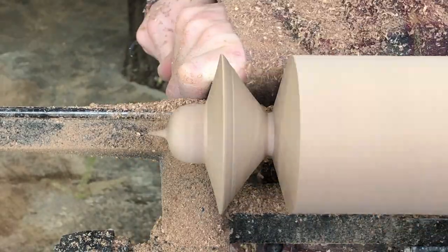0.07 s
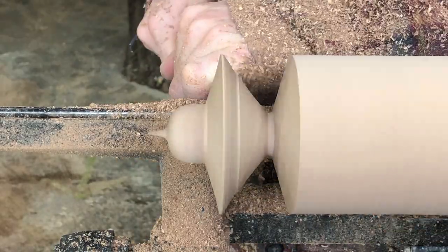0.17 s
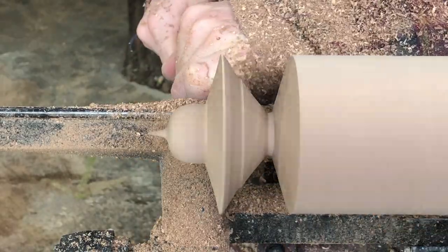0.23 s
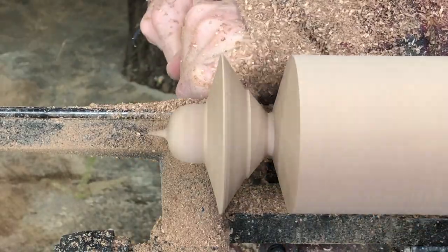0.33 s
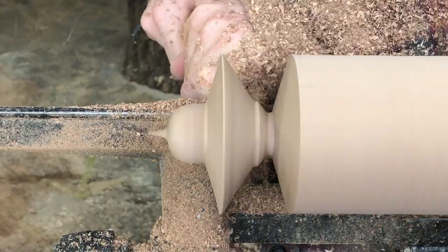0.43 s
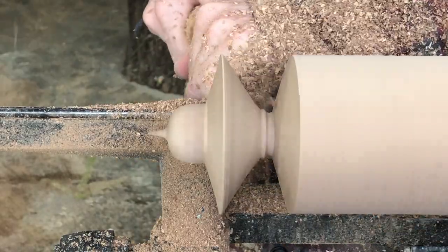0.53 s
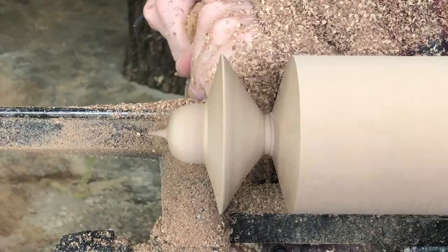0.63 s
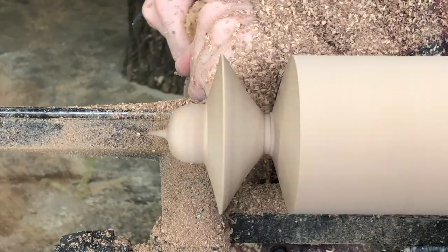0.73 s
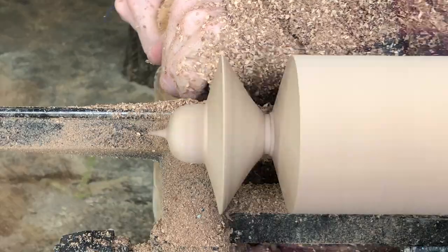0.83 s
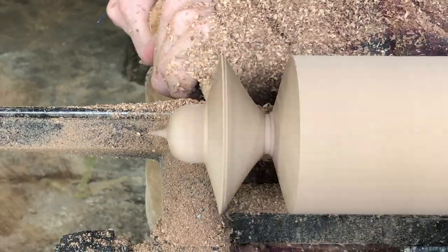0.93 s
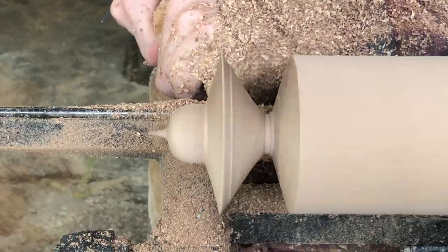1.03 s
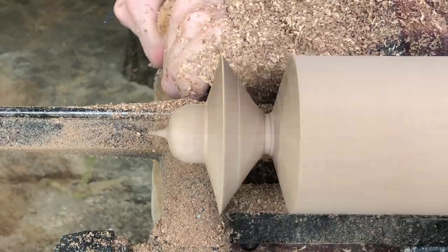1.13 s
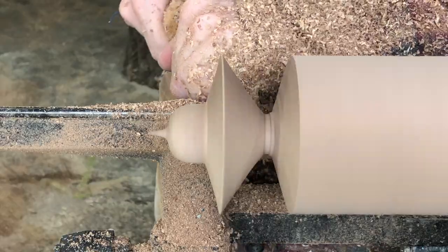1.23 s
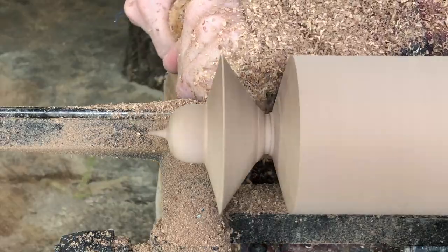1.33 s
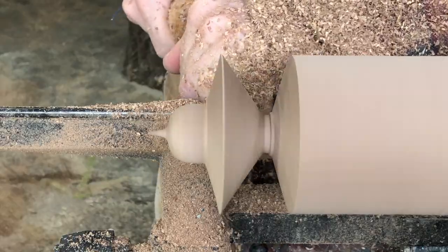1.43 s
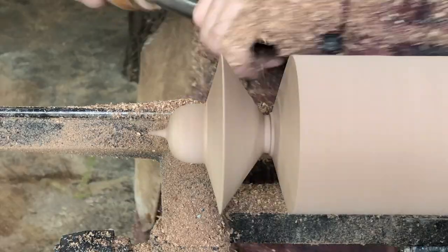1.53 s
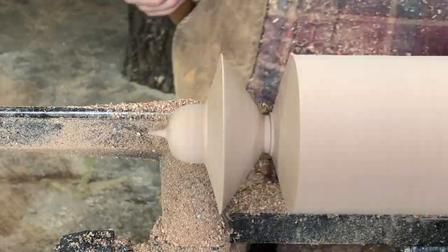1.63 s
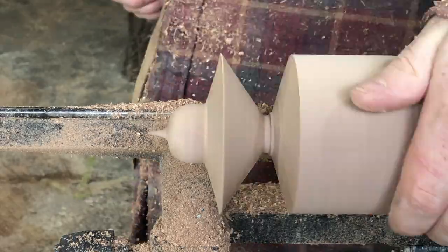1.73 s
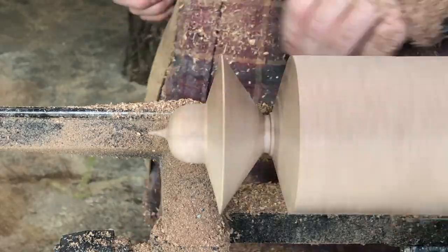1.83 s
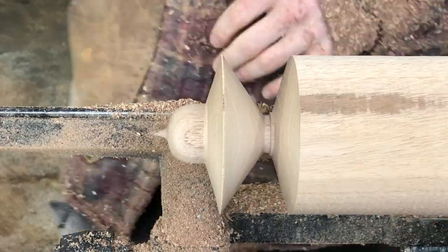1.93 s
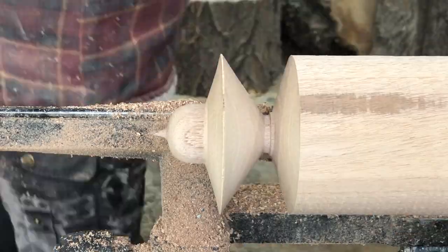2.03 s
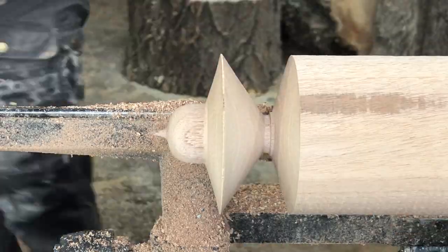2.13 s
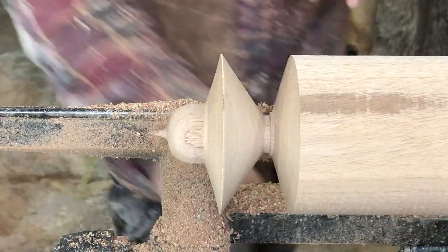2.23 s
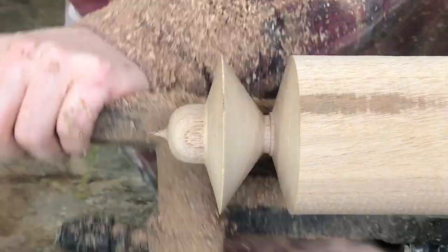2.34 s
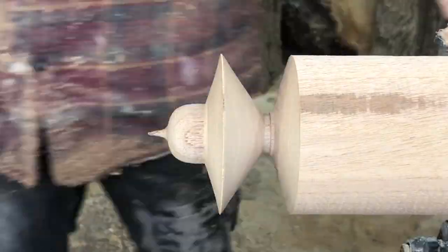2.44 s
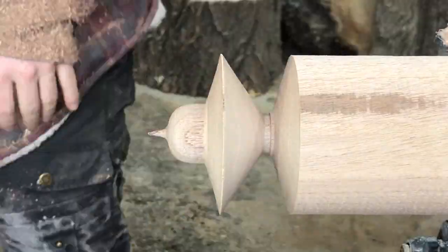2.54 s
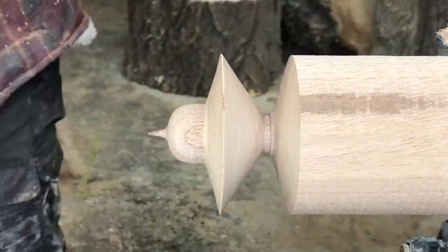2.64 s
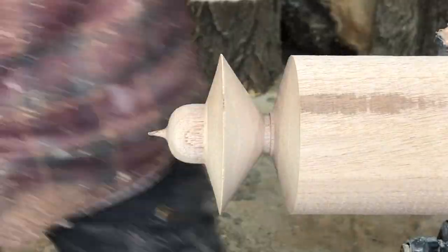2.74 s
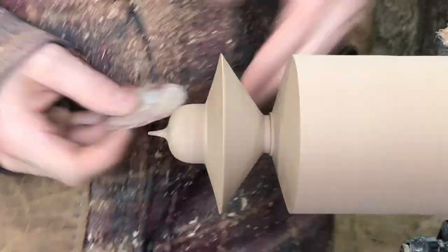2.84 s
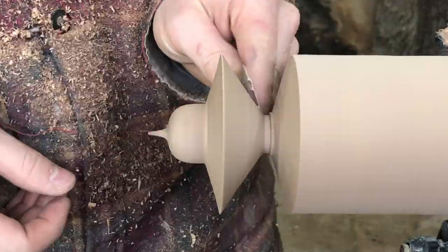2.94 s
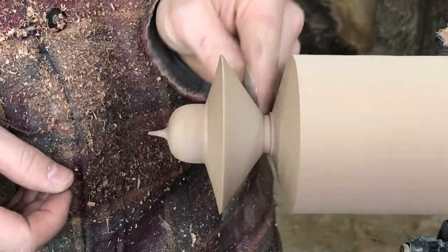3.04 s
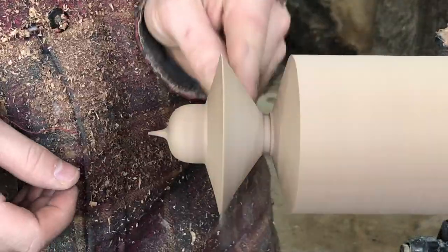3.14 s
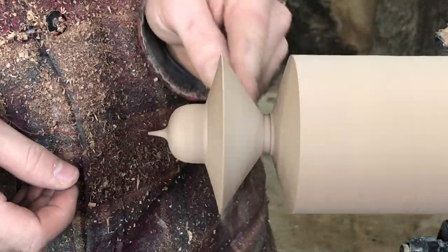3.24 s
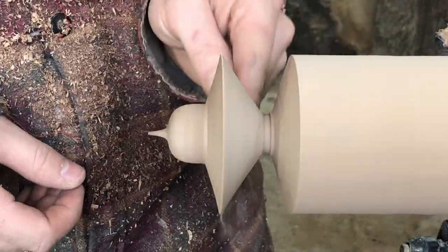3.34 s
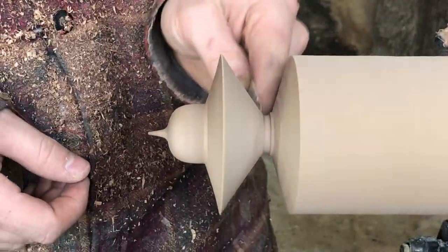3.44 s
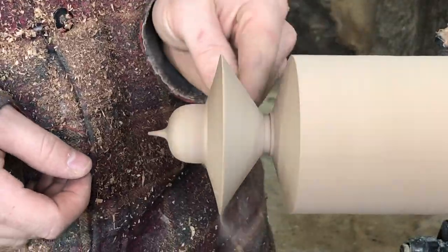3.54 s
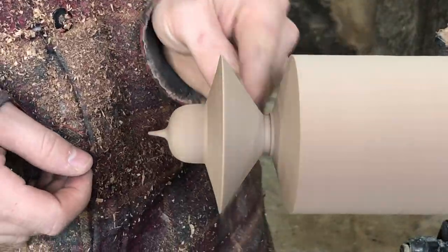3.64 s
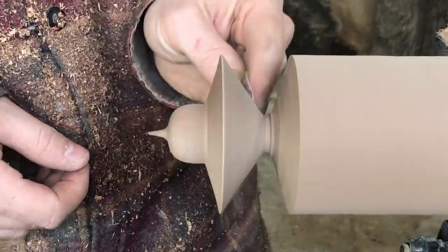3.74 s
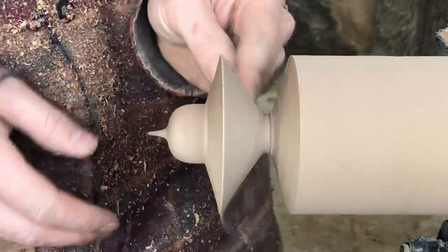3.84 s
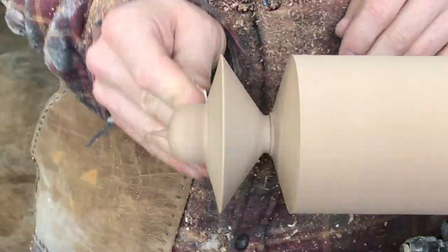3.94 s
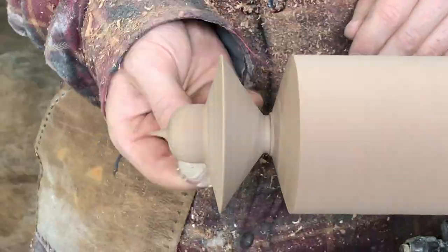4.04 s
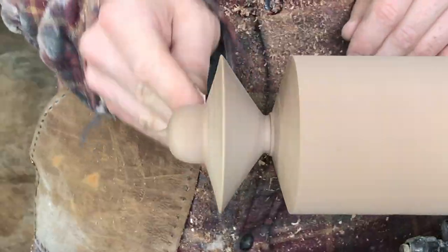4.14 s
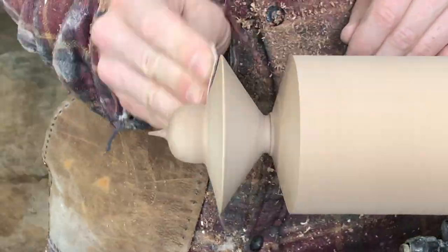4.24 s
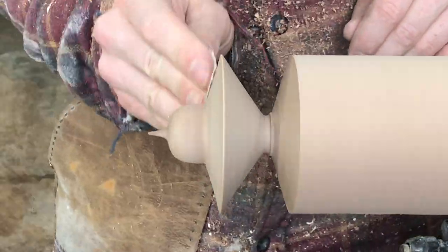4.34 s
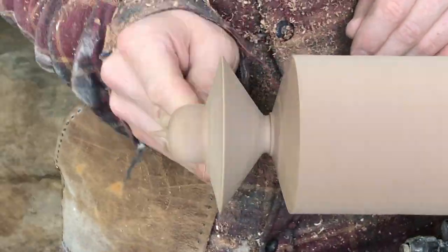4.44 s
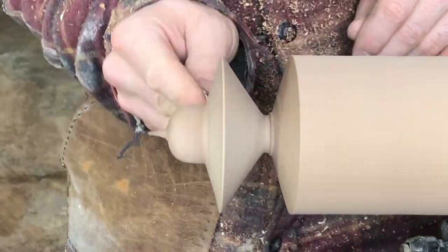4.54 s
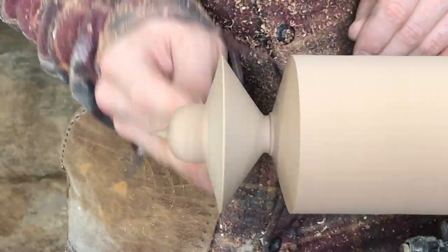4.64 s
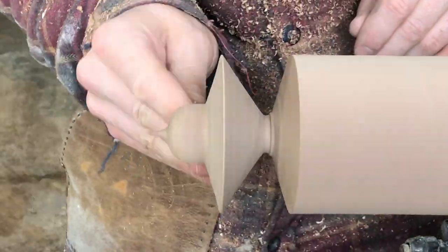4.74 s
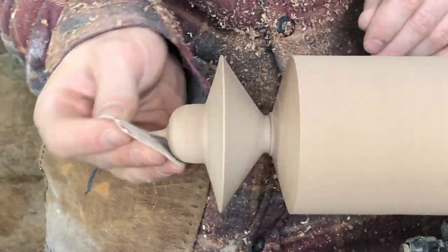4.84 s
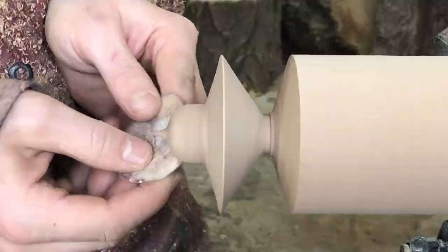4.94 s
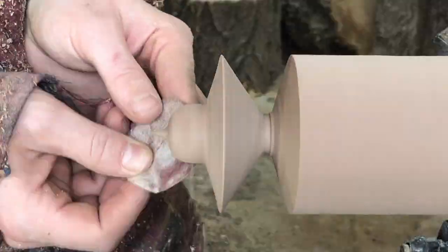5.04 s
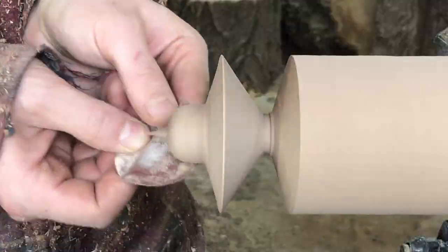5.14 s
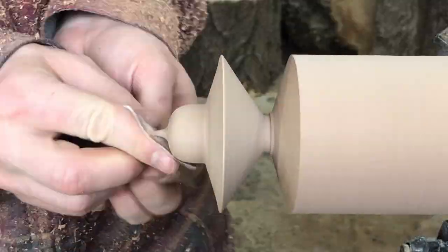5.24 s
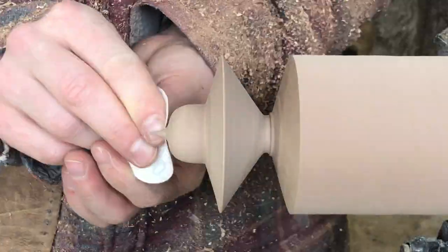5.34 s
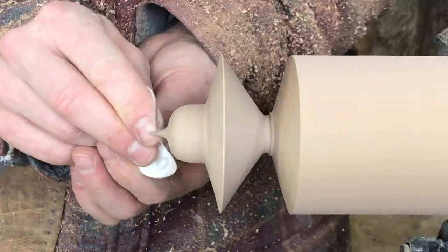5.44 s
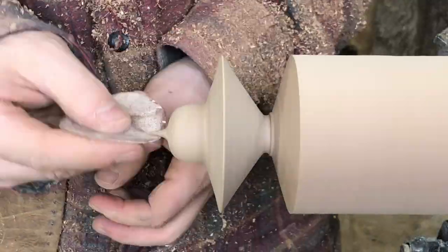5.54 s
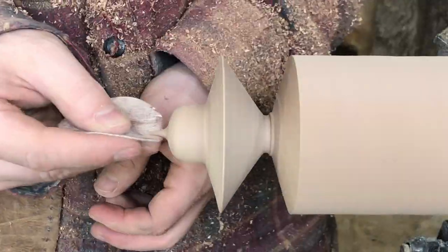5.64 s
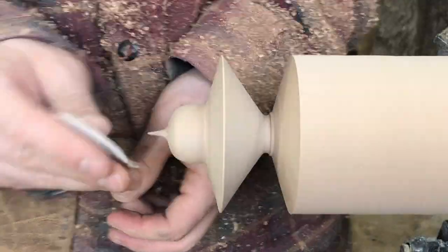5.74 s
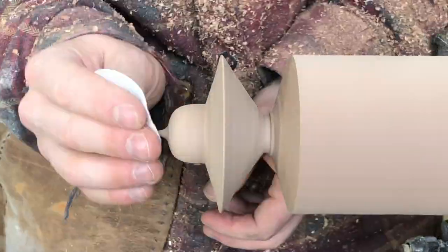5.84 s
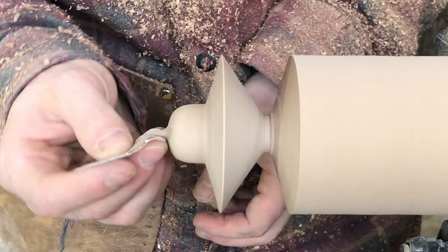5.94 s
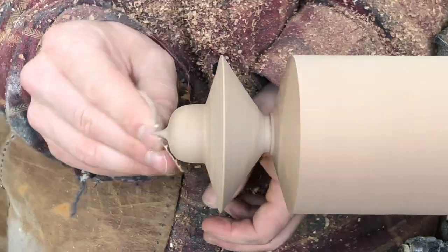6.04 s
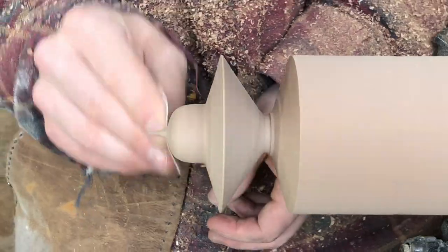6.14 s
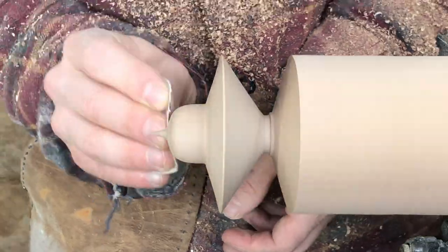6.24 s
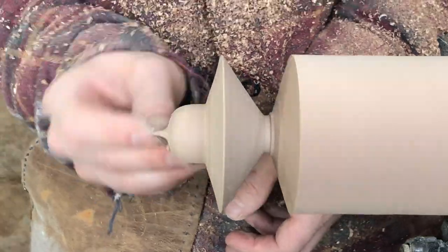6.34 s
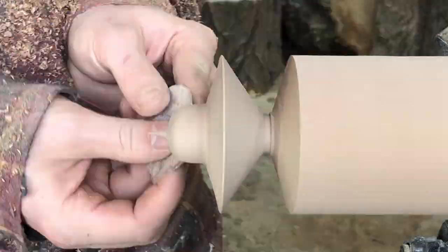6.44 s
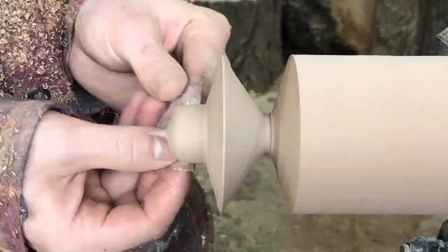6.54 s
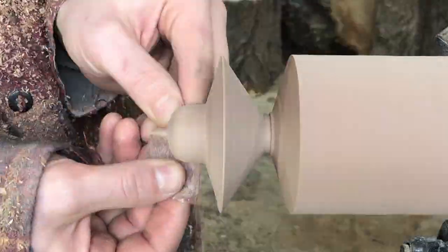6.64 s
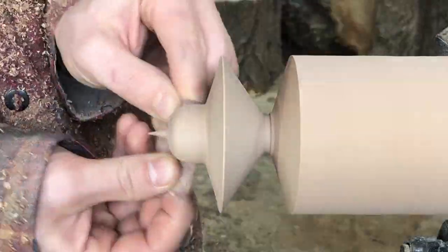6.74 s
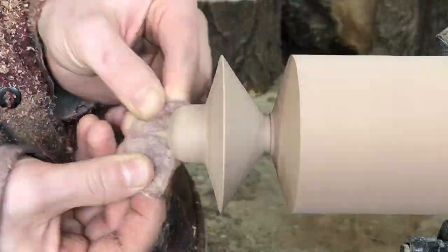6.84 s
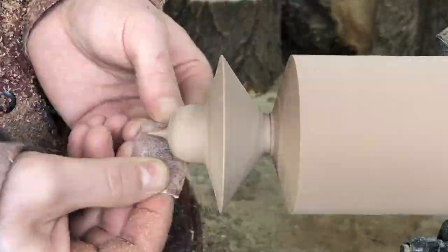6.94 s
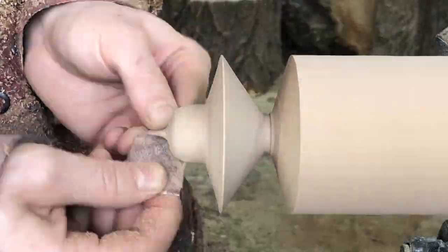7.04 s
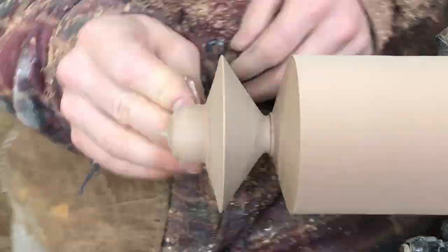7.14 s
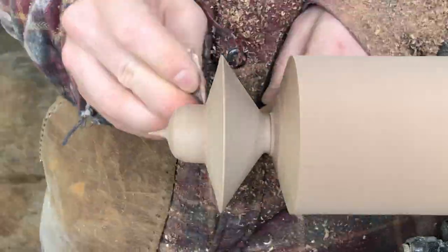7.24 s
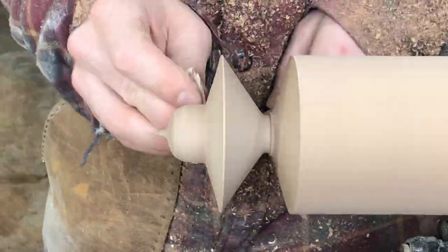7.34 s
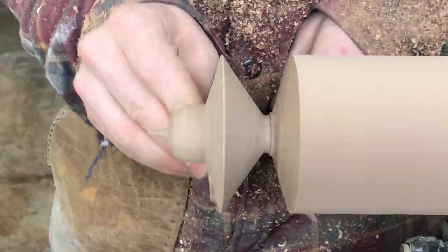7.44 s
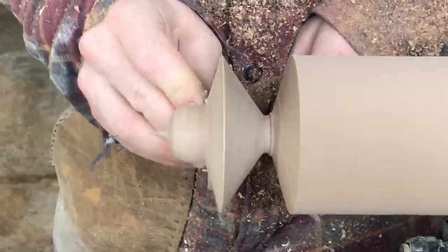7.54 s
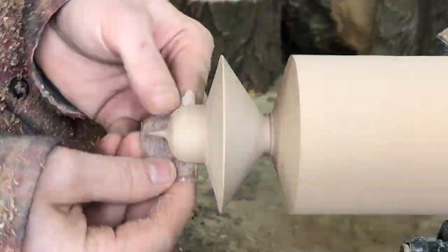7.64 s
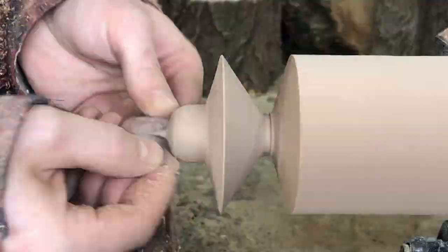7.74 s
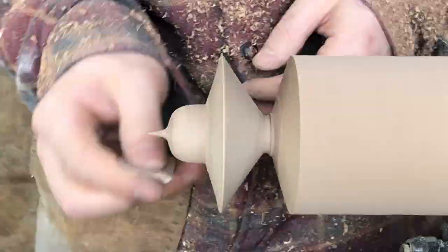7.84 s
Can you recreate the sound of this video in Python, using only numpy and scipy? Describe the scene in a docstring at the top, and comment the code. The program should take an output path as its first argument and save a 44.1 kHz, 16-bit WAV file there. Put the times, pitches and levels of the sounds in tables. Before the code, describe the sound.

Sandpaper hisses and squeals against wood spinning on a lathe, pauses for two sharp knocks, then resumes with a higher, steady hiss.

```python
"""A mid hiss that sizzles and squeals with pressure: sandpaper held by hand against wood spinning on a
lathe, close to one microphone in a dry workshop. The grit rings many narrow resonances, and the paper
squeals where it sticks and slips. A pause brings handling ticks and two sharp knocks; then the hiss
returns and jumps to a higher, steady voice. Behind it lie faint room tone and, for the first few
seconds, a thin whine that glides down."""
import sys
import numpy as np
from scipy import signal
from scipy.fft import rfft, irfft
from scipy.io import wavfile
from scipy.ndimage import uniform_filter1d

SR = 44100
rng = np.random.default_rng(int(sys.argv[2]) if len(sys.argv) > 2 else 0)


def digitize_waveform(pressure):
    """Quantize a signal to 16-bit integers and store it at the path in sys.argv[1].

    Rows of a 2-D input are taken as channels; values are limited to [-1, 1].
    """
    field = np.atleast_2d(pressure).T
    bounded = np.clip(field, -1, 1)
    quanta = np.round(bounded * 32767).astype(np.int16)
    wavfile.write(sys.argv[1], SR, quanta)


N = 347508
TIME = np.arange(N) / SR
FREQ = np.arange(N // 2 + 1) * SR / N

# paper on the wood, two low strokes and a high one: (start [s], end [s], release [s], level [dB])
STROKES = [(-.02, 1.806, .085, -39.5), (2.838, 3.444, .01, -39.5), (3.428, 8, .01, -39.1)]
# stick-slip squeals: (middle [s], length [s], pitch [Hz], level [dB])
SQUEALS = [(0.53, 0.033, 3860, -43), (0.66, 0.027, 2934, -34), (0.726, 0.038, 2955, -33),
           (0.757, 0.027, 3000, -39.5), (1.477, 0.017, 2930, -35)]


def sanding(attack_s=0.014):
    """Close to the microphone, grit scrapes the spinning wood and rings fixed resonances."""
    # broad rub of the lower and the higher hiss: (frequency [Hz], level [dB])
    low_rub = [(30, -28.5), (120, -29), (300, -29.5), (700, -31), (1500, -30.5), (2200, -28.5), (3500, -22),
               (6000, -22.5), (7300, -26.0), (10000, -25.5), (12000, -25.5), (14500, -22), (16000, -24.5)]
    high_rub = [(30, -26.5), (200, -27), (300, -26), (500, -25.1), (1300, -23.5), (3500, -23.0),
                (4500, -24.5), (5600, -23), (8000, -20.5), (10000, -22.5), (12000, -24), (14000, -24),
                (16000, -26.5)]
    # resonances standing on each rub: (frequency [Hz], width [Hz], level [dB])
    low_modes = [(1130, 12, -16.7), (1440, 12, -14.3), (1806, 20, -19.4), (1872, 20, -13.3),
                 (2142, 13, -12.1), (2451, 98, -13.0), (2520, 43, -18.7), (3117, 12, -6.5), (3260, 90, -17),
                 (3607, 54, -9.6), (3759, 49, -13.8), (3872, 52, -4.6), (4027, 18, -2.3), (4282, 13, -1.4),
                 (4394, 59, -1.5), (4537, 32, -5.1), (4791, 19, -11.4), (4983, 74, -4.7), (5043, 19, 0.0),
                 (5486, 181, -13.1), (5720, 15, -10), (5862, 20, -15.4), (5971, 24, -16.5),
                 (6234, 14, -7.1), (6466, 69, -8.0), (6618, 43, -9.3), (6764, 48, -10.2), (7664, 43, -17.8),
                 (8025, 40, -18.3), (8565, 18, -14.9)]
    high_modes = [(2268, 151, -19.6), (2398, 12, -16.2), (2753, 12, -16.8), (3120, 23, -15.7),
                  (3571, 23, -14.6), (4090, 159, -16.1), (4764, 25, -19.9), (5196, 15, -11.9),
                  (5400, 150, -20), (6001, 73, -14.9), (6270, 69, -15.6), (6446, 46, -7.4),
                  (6541, 25, -9.4), (6711, 20, -4.7), (7139, 15, 0.0), (7300, 14, -5.0), (7339, 119, -7.9),
                  (7573, 34, -7.0), (8318, 106, -7.6), (8403, 30, -3.0), (9185, 207, -16.4),
                  (9536, 17, -11.8), (10399, 18, -11.0), (10728, 59, -10.7), (10818, 45, -8.8),
                  (11028, 72, -13.2), (11275, 83, -13.8), (12790, 70, -20.5), (13380, 100, -21),
                  (14280, 27, -18.4)]
    contact = [undb(db) * held(start, end, attack_s, release) for start, end, release, db in STROKES]
    low_scrape = grit(scatter_db=0.5, grain_rate=530, waver_db=0.17)
    high_scrape = grit(scatter_db=-0.14, grain_rate=900, waver_db=0.1)
    first = ring(low_scrape, low_rub, touched(low_modes, damped_db=-1.5)) * contact[0]
    second = ring(low_scrape, low_rub, touched(low_modes, tilt_db=-0.5)) * contact[1]
    last = ring(high_scrape, high_rub, high_modes) * contact[2]
    return first + second + last


def touched(modes, tilt_db=0, damped_db=0):
    """The paper's position tilts the modes (dB per octave); the fingers damp those near 5.2 kHz."""
    return [(hz, width, db + tilt_db * np.log2(hz / 4000) + damped_db * np.exp(-((hz - 5200) / 500) ** 2))
            for hz, width, db in modes]


def pressing(build_db=10.5, ease_s=0.037, rush_db=-50.5):
    """The hand leans in harder, then eases off; the pressure adds a top sizzle and a low rush."""
    # pushes of the hand: (peak time [s], build-up [s], sizzle level [dB])
    pushes = [(.485, .42, -34), (.585, 0.11, -35), (.73, .2, -43), (1.24, 0.42, -41.5), (1.44, 0.27, -38)]
    # spectra of sizzle and rush: (frequency [Hz], level [dB])
    sizzle_colour = [(5290, -24), (9000, -14), (10300, -13), (11100, -10), (12600, -2), (13700, -2),
                     (15100, -0.5), (16000, -5.5)]
    rush_colour = [(25, 2), (60, -1), (400, 1.5), (1000, 0), (2000, -0.5), (3500, -0.5), (8000, -29)]
    # resonances in the sizzle: (frequency [Hz], width [Hz], level [dB])
    sizzle_modes = [(10000, 60, -2), (10960, 70, -1), (11370, 60, 2), (12100, 120, 1), (13800, 110, 1),
                    (13450, 64, 1)]
    # the paper catches once, with a burst of rush: (middle [s], length [s], level [dB])
    catch = (0.393, 0.084, -49.5)
    pressure = np.zeros(N)
    for peak, build, db in pushes:
        leaning = undb(db + build_db * np.minimum(TIME - peak, 0) / build)
        easing = np.exp(-np.maximum(TIME - peak, 0) / ease_s)
        pressure = np.maximum(pressure, leaning * easing)
    catch_s, catch_length, catch_db = catch
    drag = undb(rush_db) * (pressure / pressure.max()) ** 1.5
    drag += undb(catch_db) * swell(catch_s, catch_length)
    sizzle = ring(grit(scatter_db=1.5, grain_rate=600, waver_db=2.2), sizzle_colour, sizzle_modes)
    rush = ring(grit(scatter_db=2.5, grain_rate=300, waver_db=-1.6), rush_colour)
    return sizzle * pressure + rush * drag


def squeals(chatter_hz=255, chatter_depth=0.14):
    """The paper sticks and slips, its edge chattering; the pitch sags and breaks up as it lifts off."""
    # lift-off chirps: (middle [s], length [s], pitch [Hz], glide [octaves/s], level [dB])
    chirps = [(1.67, .05, 3920, -2, -47), (1.704, .028, 2450, -5, -45), (1.715, .055, 4600, -4, -44),
              (1.738, .026, 2430, -2, -45), (1.74, .03, 3650, -3, -47), (1.742, .04, 2000, -5, -52)]
    pressed = sum(undb(db) * slip(middle, length, hz, glide=0, jitter=0.012, octave_db=-10)
                  for middle, length, hz, db in SQUEALS)
    lifted = sum(undb(db) * slip(middle, length, hz, glide, jitter=0.028, octave_db=-18)
                 for middle, length, hz, glide, db in chirps)
    return (pressed + lifted) * (1 + chatter_depth * narrow(chatter_hz, width=59.8))


def slip(middle, length, hz, glide, jitter, octave_db):
    """One stick-slip tone with its octave, swelling and fading."""
    age = np.clip(TIME - middle, -3 * length, 3 * length)
    pitch = hz * 2 ** (glide * age) * (1 + jitter * walk(900))
    phase = 2 * np.pi * np.cumsum(pitch) / SR
    return np.sqrt(2) * swell(middle, length) * (np.sin(phase) + undb(octave_db) * np.sin(2 * phase))


def rasp(relative_db=-9):
    """A broad scrape goes with each squeal."""
    # its spectrum: (frequency [Hz], level [dB])
    colour = [(500, -28), (2400, 1), (5000, -1), (10000, 3), (16000, -20)]
    force = sum(undb(db) * swell(middle, length) for middle, length, _, db in SQUEALS)
    return undb(relative_db) * force * ring(noise(), colour)


def singing(fade_s=0.044):
    """Single resonances sing on while the contact feeds them more strongly."""
    # singing resonances: (start [s], end [s], pitch [Hz], width [Hz], level [dB])
    voices = [(0.23, .68, 2845, 13.9, -52), (.3, 1.6, 2965, 43, -58.5), (0.99, 1.48, 3200, 14, -56),
              (0.998, 1.15, 2848, 7.9, -49), (1.144, 1.225, 2840, 8.8, -44.5), (.4, 1.2, 2585, 25, -59),
              (0.7, 0.88, 1812, 8, -57), (1.62, 1.88, 1812, 9.8, -68.5), (.58, 0.83, 13130, 90, -51),
              (1.15, 1.43, 14000, 40, -54), (4.952, 8, 2400, 6, -59.5)]
    return sum(undb(db) * held(start, end, fade_s, fade_s) * tone(hz, width)
               for start, end, hz, width, db in voices)


def cupped_hand(width_hz=55, level_db=-69, fade_s=0.2):
    """During the last stroke the rubbing sounds faintly in the hollow of the hand."""
    # the hollow as it opens and closes: (time [s], resonance [Hz])
    hollow = [(3.6, 351), (4.3, 356.6), (4.7, 305), (5.15, 307.4), (5.6, 275.4), (6.3, 277.3), (6.8, 324),
              (7.15, 302), (7.65, 350)]
    centre_hz = np.interp(TIME, *np.transpose(hollow))
    start, end, _, _ = STROKES[-1]
    return undb(level_db) * narrow(centre_hz, width_hz) * held(start, end, fade_s, fade_s)


def knocks(rise_s=0.0012, room_db=-41, room_t60=0.18, echo_top_hz=1550):
    """Two blows ring well-damped modes under a crack; the workshop adds dull echoes and a faint tail."""
    # a light blow, then a heavy one: (time [s], level [dB], t60 [s], crack against ring [dB])
    blows = [(2.159, -25, 0.035, -2.5), (2.643, -15, 0.03, 0)]
    # modes of the two struck parts: (frequency [Hz], level [dB])
    light_modes = [(2000, -13), (2310, -13), (2790, -10), (3070, -1), (3510, -12), (3740, -13), (4550, -10),
                   (4880, -8), (5590, -7), (6160, 0), (7230, -8), (8260, -13), (8840, -10)]
    heavy_modes = [(1200, -13), (1315, -8), (1450, -9), (1690, -6), (1915, -9), (2180, -7), (2590, 0),
                   (2900, -5), (3030, -3), (3170, -6), (3320, -5), (3630, -6), (4130, -10), (5100, -10),
                   (5370, -9), (6130, -12), (7370, -13)]
    # spectra of the two cracks and the room's tail: (frequency [Hz], level [dB])
    light_crack = [(200, -62), (500, -52), (900, -29), (1750, -30), (2050, -15), (3100, -13), (5500, -7),
                   (7000, -11), (12000, -17), (16000, -25)]
    heavy_crack = [(60, -46), (300, -38), (600, -29), (950, -21), (1300, -13), (2600, -1.5), (3800, -11.5),
                   (5300, -8.5), (7500, -14), (8500, -21), (11500, -17.5), (16000, -34)]
    room_colour = [(100, -34), (700, -17), (1350, 2), (2100, -10), (4000, -15), (12000, -44)]
    # reflections off bench and wall: (delay at the microphone [s], level [dB])
    echoes = [(.022, -20.5), (0.032, -23), (.046, -29), (.057, -30)]
    parts = [(light_modes, light_crack), (heavy_modes, heavy_crack)]
    direct, tail = np.zeros(N), np.zeros(N)
    for (start, db, t60, crack_db), (modes, crack_colour) in zip(blows, parts):
        body = unit(sum(undb(mode_db) * tone(hz) for hz, mode_db in modes))
        crack = undb(crack_db) * ring(noise(), crack_colour)
        decay = strike(start, rise_s, t60)
        # the strength of the blow sets its energy, whatever the phases of the modes
        direct += undb(db) * np.sqrt(np.mean(decay ** 2)) * unit((body + crack) * decay)
        tail += undb(db + room_db) * ring(noise(), room_colour) * strike(start, 0.018, room_t60)
    dull = signal.sosfilt(signal.butter(6, echo_top_hz, fs=SR, output="sos"), direct)
    return direct + tail + sum(undb(db) * np.interp(TIME - delay, TIME, dull) for delay, db in echoes)


def ticks(faint_count=6, faint_db=-64, spread_db=3):
    """Dry contacts of fingers and paper crackle briefly; fainter ones fall at random in the pause."""
    # handling contacts: (time [s], level [dB])
    contacts = [(1.834, -50), (1.870, -51.5), (1.934, -57.5), (2.033, -46), (2.1425, -40), (2.334, -51.5),
                (2.449, -53.5), (2.506, -47), (2.850, -31.5)]
    # their spectrum: (frequency [Hz], level [dB])
    colour = [(150, -32), (900, -12), (2200, -1.5), (5000, 0.5), (8000, -4), (15000, -3)]
    pause_start, pause_end = STROKES[0][1], STROKES[1][0]
    faint = [(pause_start + (pause_end - pause_start) * when, faint_db + spread_db * (2 * size - 1))
             for when, size in rng.random((faint_count, 2))]
    force = sum(undb(db) * strike(start, rise=0.00068, t60=0.034) for start, db in list(contacts) + faint)
    return force * ring(grit(scatter_db=3.5, grain_rate=1100, waver_db=0.3), colour)


def scuffs():
    """Fingers and paper slide briefly: a duller crackle that swells and fades."""
    # soft slides: (middle [s], length [s], level [dB])
    slides = [(1.863, .05, -58.5), (1.983, .018, -56.5), (2.018, 0.013, -58), (2.121, .016, -62),
              (2.257, .018, -54.5), (2.303, 0.015, -53), (2.620, 0.049, -57.5), (2.800, .014, -58),
              (2.821, 0.031, -47.5)]
    # their spectrum: (frequency [Hz], level [dB])
    colour = [(150, -28), (900, -15), (2200, 1.5), (5000, -1), (8000, -6), (15000, -5.5)]
    force = sum(undb(db) * swell(middle, length) for middle, length, db in slides)
    return force * ring(grit(scatter_db=3.5, grain_rate=1100, waver_db=0.5), colour)


def pings(rise_s=0.0034):
    """Small parts ring briefly when touched."""
    # touches: (time [s], pitch [Hz], level [dB], t60 [s])
    touches = [(1.834, 4470, -59, 0.21), (2.336, 2430, -60, 0.067), (2.462, 3740, -58, 0.13),
               (2.599, 1390, -50, 0.044), (2.600, 2140, -49, .03)]
    return sum(undb(db) * strike(start, rise_s, t60) * tone(hz) for start, hz, db, t60 in touches)


def whine(start_hz=1355, halving_s=11.6, level_db=-73, end_s=3.55, fade_s=0.3):
    """In the background a thin, wavering tone coasts down and fades out."""
    coasting_hz = start_hz / (1 + TIME / halving_s)
    phase = 2 * np.pi * np.cumsum(coasting_hz * (1 + 0.0011 * walk(30))) / SR
    level = undb(level_db + 2.5 * walk(2.9)) * held(0, end_s, fade_s, fade_s)
    return np.sqrt(2) * np.sin(phase) * level


def room_tone(level_db=-71.5):
    """The faint, steady noise of the workshop."""
    # its spectrum: (frequency [Hz], level [dB])
    colour = [(30, -16), (100, -18), (280, -16), (450, -14), (590, 0), (760, -3), (1000, -1.5), (1700, -5),
              (3700, -7.5), (6300, -12.5), (16000, -16)]
    return undb(level_db) * ring(noise(), colour)


def grit(scatter_db, grain_rate, waver_db):
    """Grains scraping: the force flickers grain_rate times a second and wavers with the hand."""
    return noise() * undb(scatter_db * walk(grain_rate) + waver_db * walk(6.8))


def ring(force, colour, modes=()):
    """Send a force through a body with a broad colour and steep resonances; rms 1."""
    hz, db = np.transpose(colour)
    power = undb(np.interp(np.log(FREQ + 1), np.log(hz), db)) ** 2
    for centre, width, peak_db in modes:
        detune = 1.28 * (FREQ - centre) / width  # width spans the half-power points
        power += (undb(peak_db) / (1 + detune ** 2)) ** 2
    return unit(irfft(rfft(force) * np.sqrt(power), N))


def narrow(hz, width):
    """Noise in one narrow resonance, whose centre may move; rms about 1."""
    phase = 2 * np.pi * np.cumsum(hz * np.ones(N)) / SR
    return walk(width) * np.cos(phase) + walk(width) * np.sin(phase)


def tone(hz, width=0):
    """A sine of rms 1 whose pitch strays over about width Hz."""
    stray = width * walk(2 * width) if width else np.zeros(N)
    cycles = rng.random() + np.cumsum(hz + stray) / SR
    return np.sqrt(2) * np.sin(2 * np.pi * cycles)


def walk(rate):
    """A smooth random curve that changes about rate times a second; rms 1."""
    step = max(int(SR / rate), 2)
    stairs = np.repeat(rng.standard_normal(N // step + 1), step)
    return unit(uniform_filter1d(stairs, step)[:N])


def strike(start, rise, t60):
    """A quick rise, then an exponential decay."""
    age = TIME - start
    return np.clip(age / rise, 0, 1) * np.exp(-np.log(1000) * np.clip((age - rise) / t60, 0, 10))


def held(start, end, attack, release):
    """Fade in, hold, fade out."""
    return np.clip(np.minimum((TIME - start) / attack, (end - TIME) / release), 0, 1)


def swell(middle, length):
    """A smooth rise and fall about one moment."""
    return np.exp(-np.square(2 * (TIME - middle) / length))


def noise():
    """White noise."""
    return rng.standard_normal(N)


def undb(db):
    """Decibels to gain."""
    return 10 ** (np.asarray(db) / 20)


def unit(x):
    """Scale to rms 1."""
    return x / np.sqrt(np.mean(x ** 2))


def scene():
    """One microphone close to the lathe, the same in both channels."""
    paper = sanding() + pressing() + squeals() + rasp() + singing() + cupped_hand()
    handling = knocks() + ticks() + scuffs() + pings()
    mono = paper + handling + whine() + room_tone()
    return np.array([mono, mono])


def record(dry):
    """The recorder cuts the treble steeply above 15.8 kHz."""
    return signal.sosfilt(signal.ellip(12, 0.1, 80, 15800, fs=SR, output="sos"), dry)


dry = scene()
out = record(dry)
digitize_waveform(out)
```